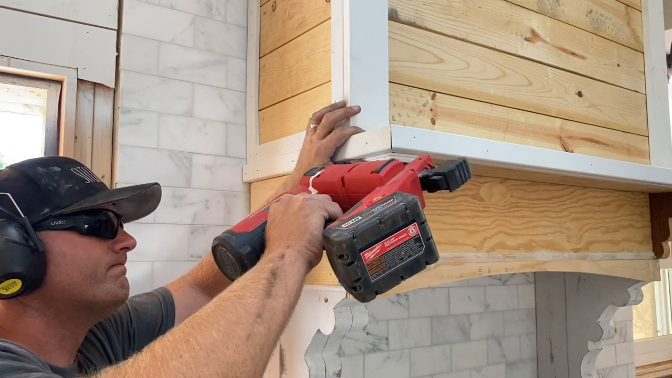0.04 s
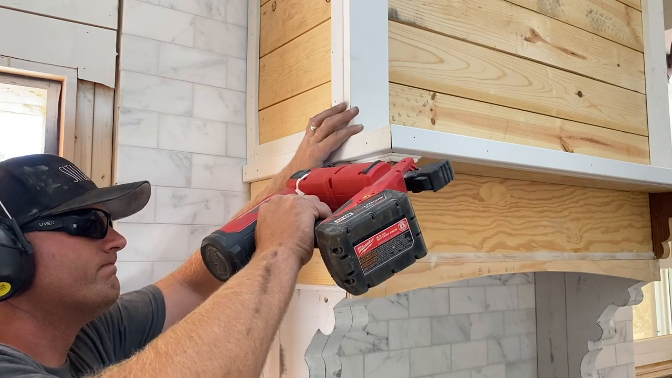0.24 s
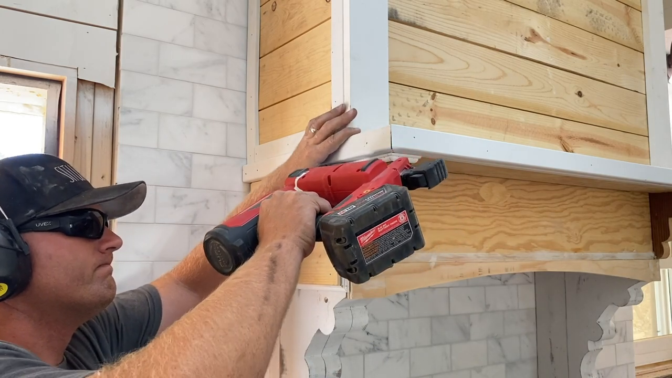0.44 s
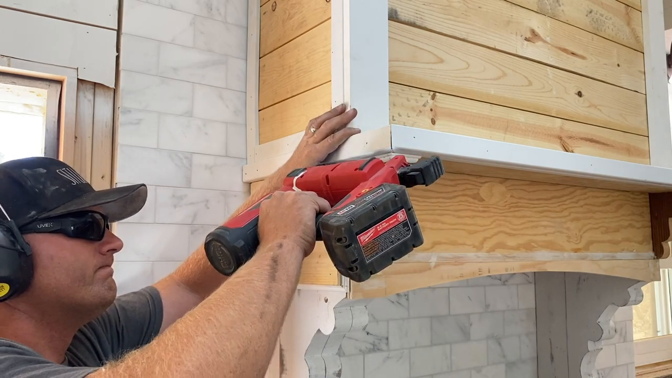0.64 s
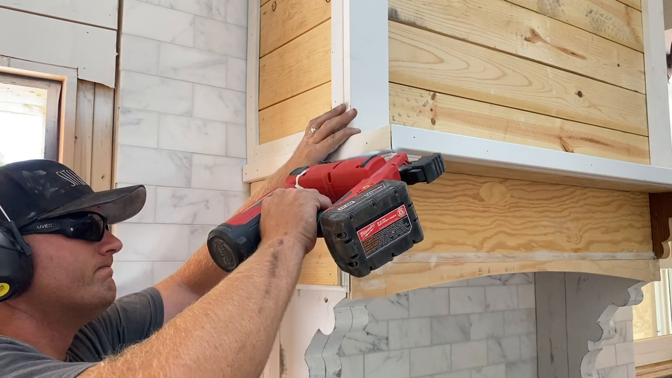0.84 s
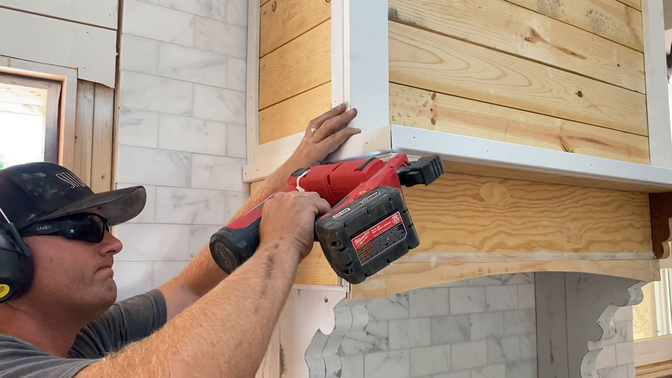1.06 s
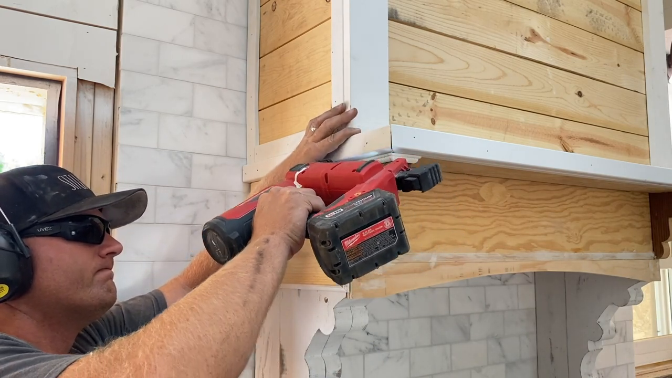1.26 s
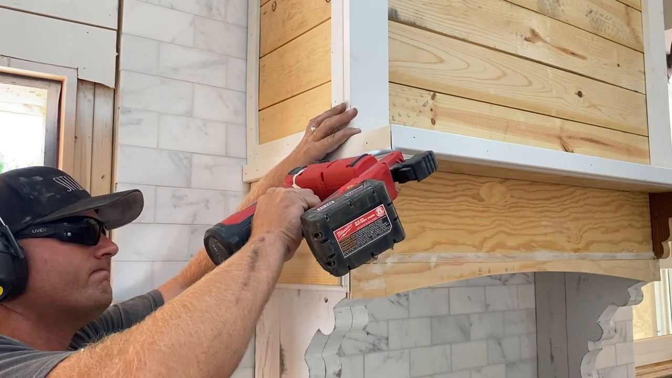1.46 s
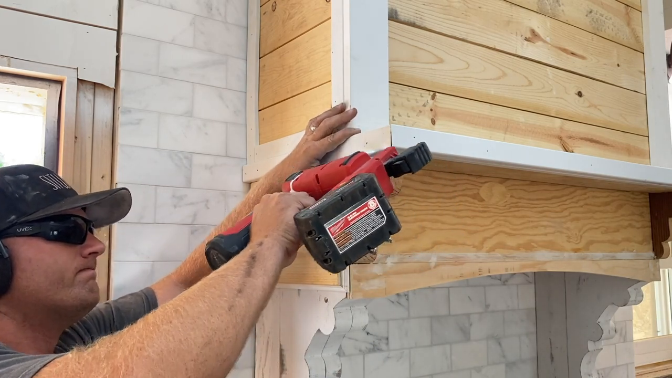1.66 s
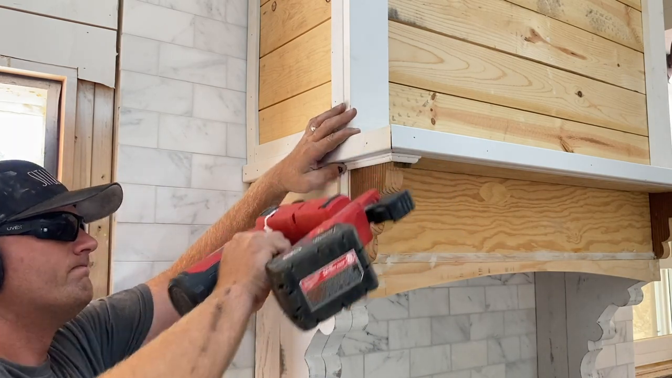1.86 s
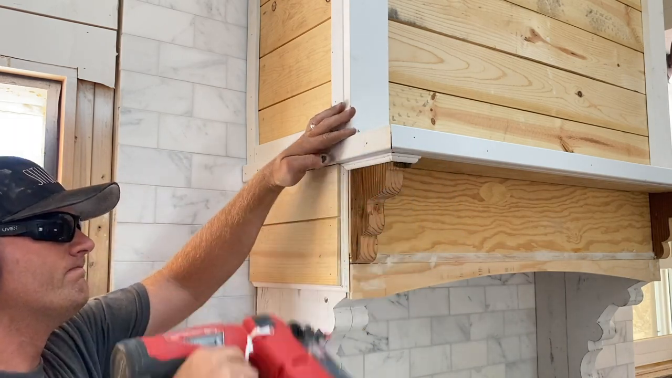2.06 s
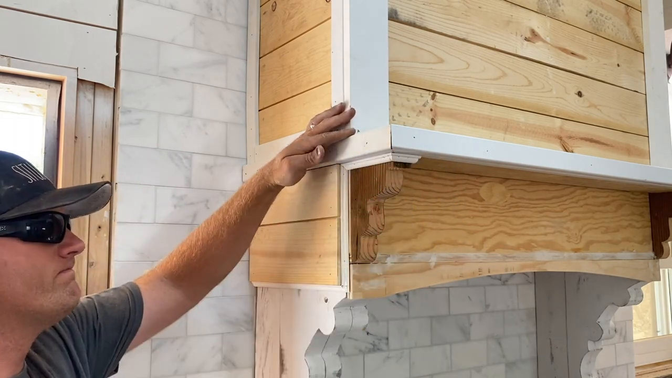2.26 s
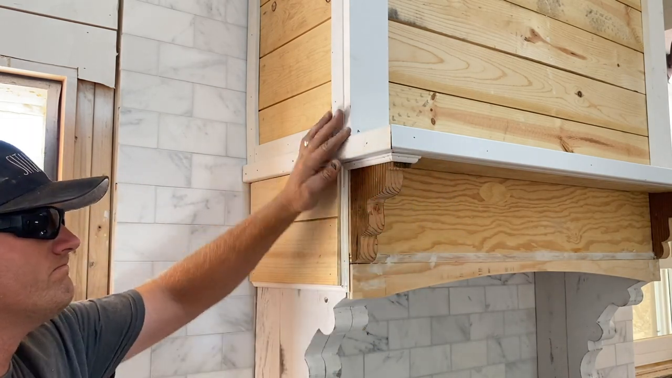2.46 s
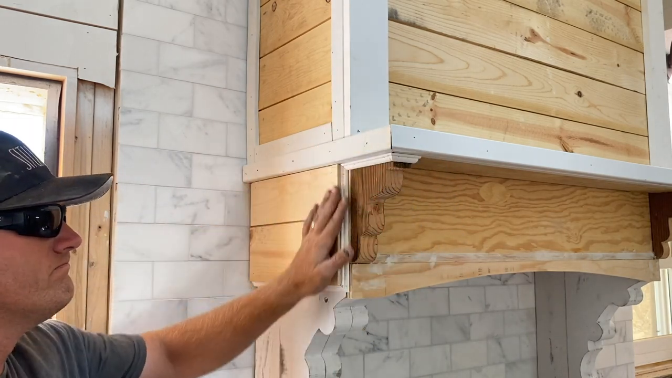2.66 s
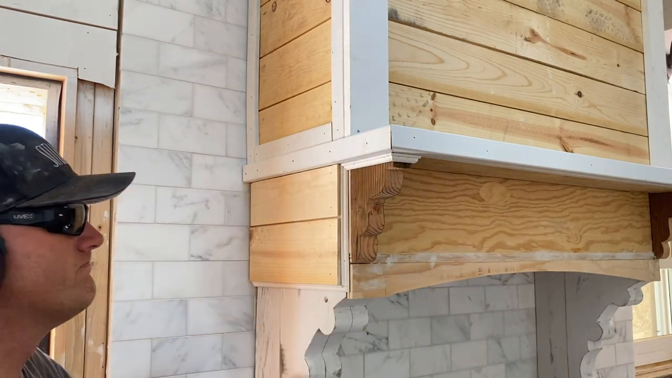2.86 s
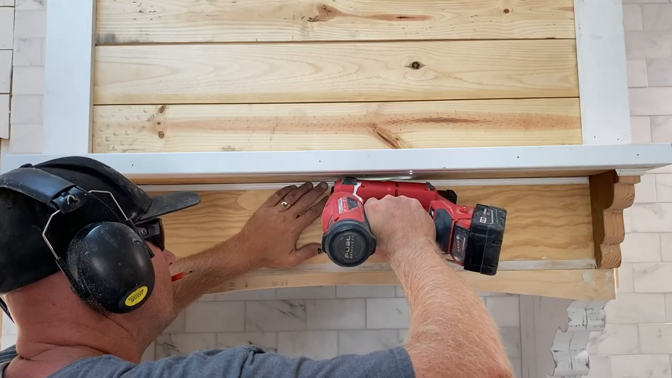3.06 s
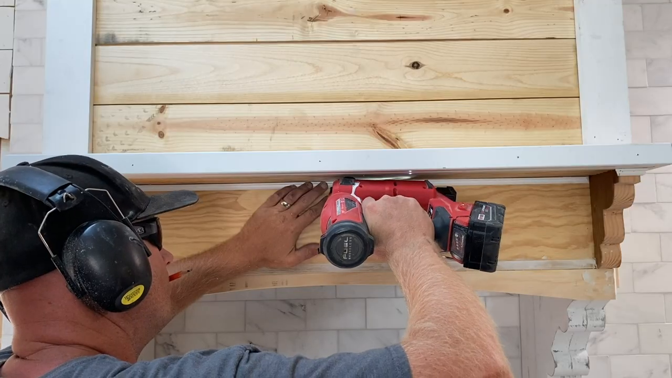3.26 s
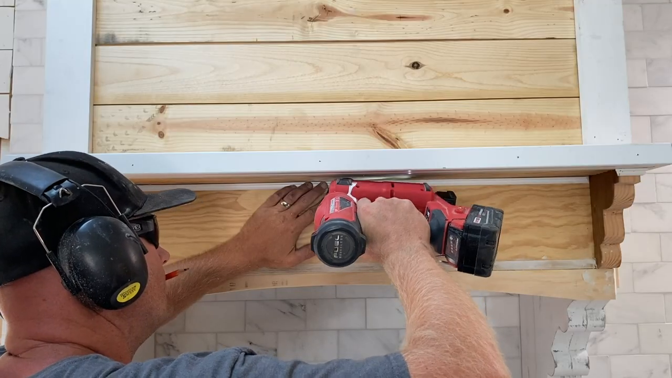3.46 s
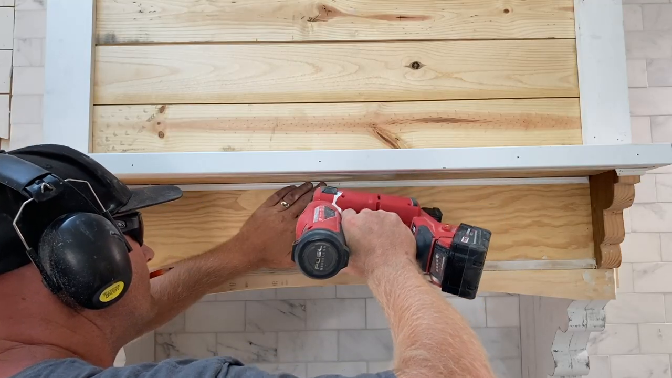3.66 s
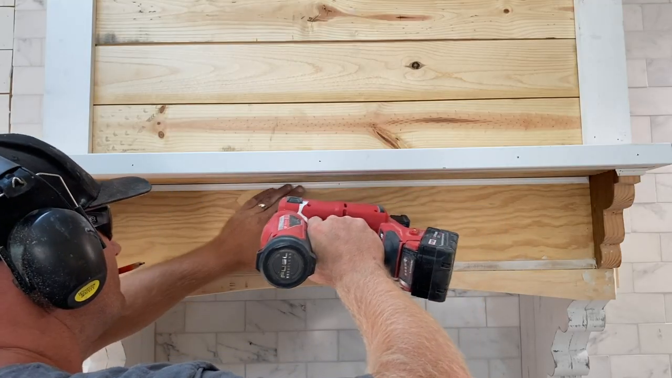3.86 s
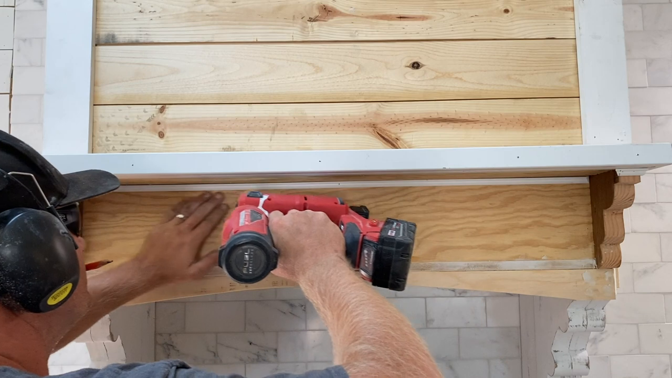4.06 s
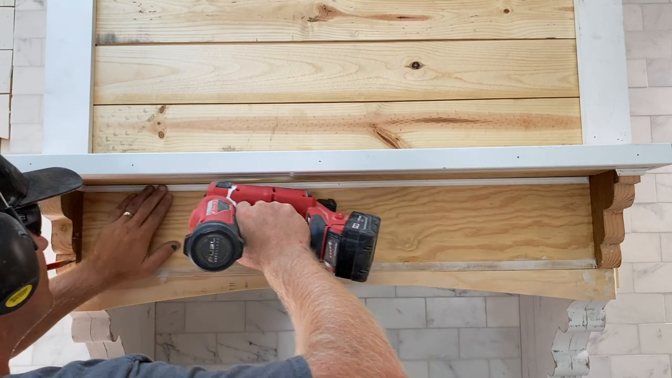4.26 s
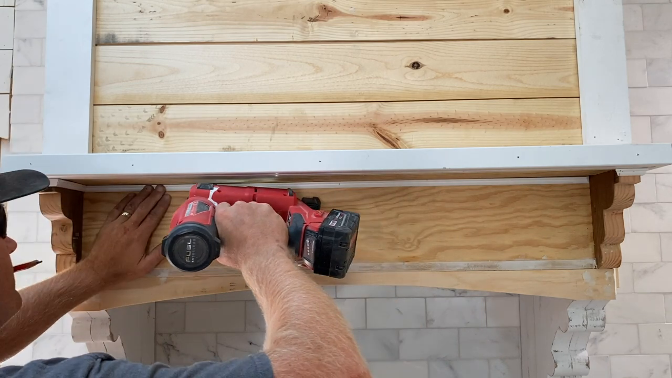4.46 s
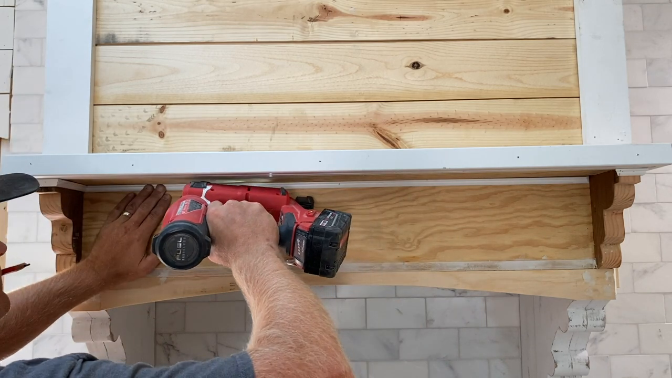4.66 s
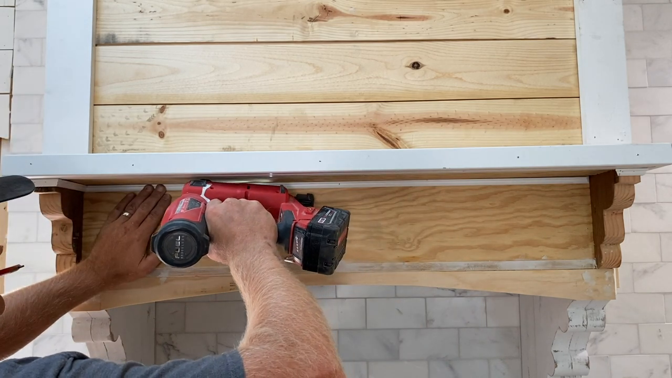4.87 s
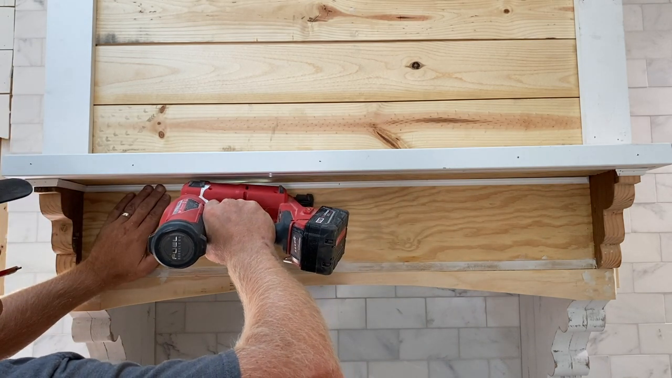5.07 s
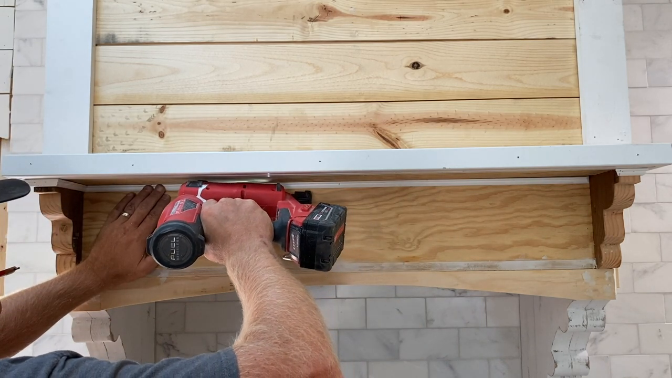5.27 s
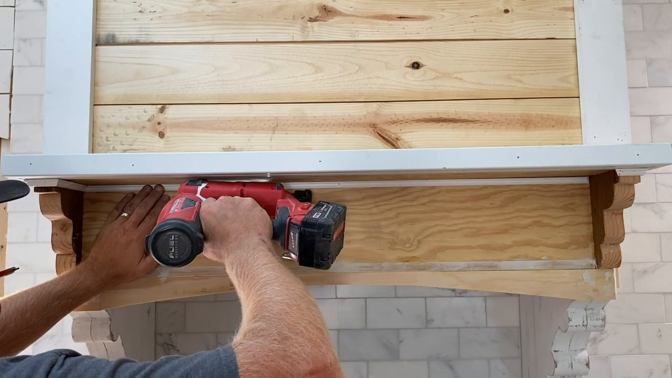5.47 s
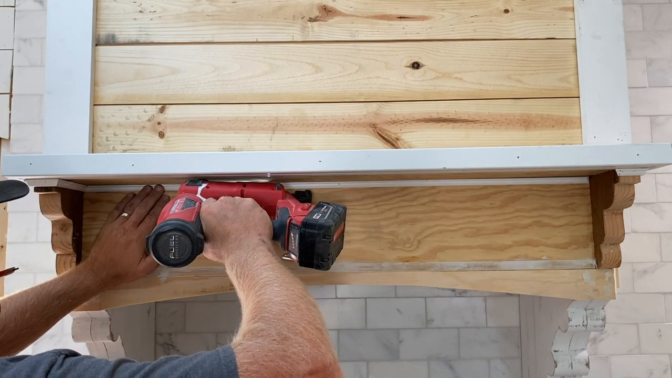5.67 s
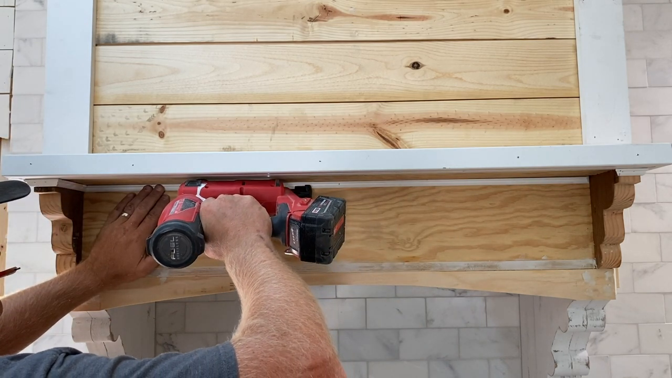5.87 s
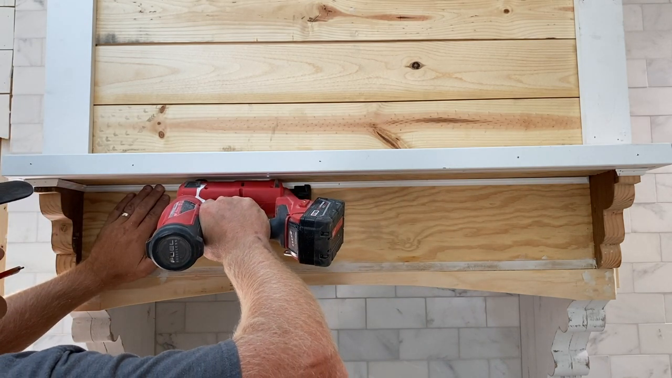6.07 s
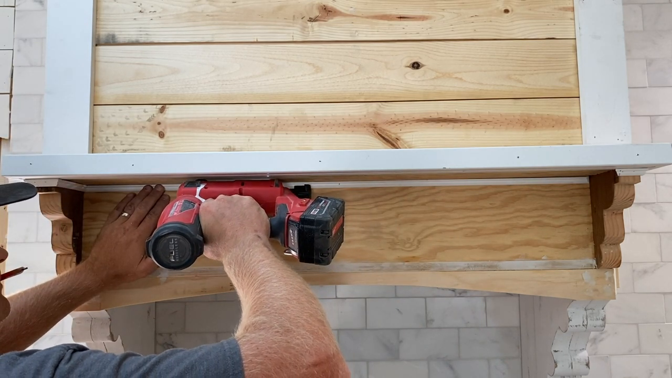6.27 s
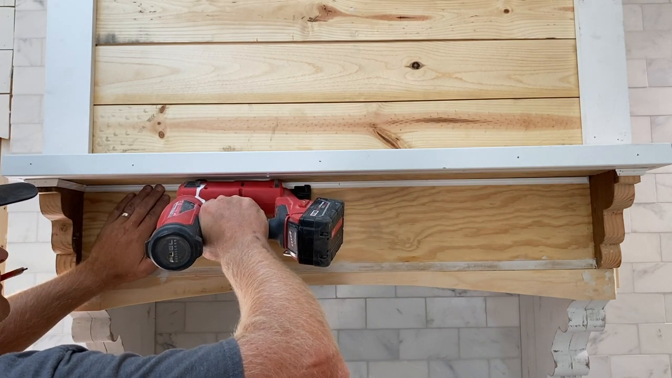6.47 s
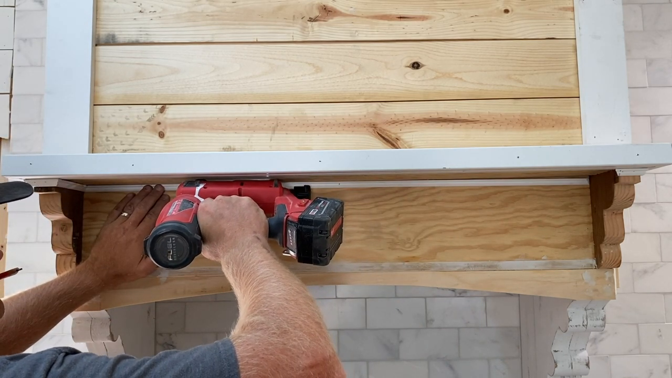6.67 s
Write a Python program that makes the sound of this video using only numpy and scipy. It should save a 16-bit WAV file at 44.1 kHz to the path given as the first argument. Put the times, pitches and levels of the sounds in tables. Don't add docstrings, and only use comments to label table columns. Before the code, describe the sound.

A battery nail gun fires three hard cracking shots into wooden trim, each with a brief gear whine, in a ringing tiled room over low hum.

```python
import sys
import numpy as np
from scipy import signal
from scipy.fft import rfft, irfft, next_fast_len
from scipy.io import wavfile

SR = 44100
rng = np.random.default_rng(int(sys.argv[2]) if len(sys.argv) > 2 else 0)


def digitize_waveform(pressure):
    field = np.atleast_2d(pressure).T
    bounded = np.clip(field, -1, 1)
    quanta = np.round(bounded * 32767).astype(np.int16)
    wavfile.write(sys.argv[1], SR, quanta)


def makeup_ratio(level_db):
    decades = np.asarray(level_db, float) / 20
    return 10 ** decades


N = 296339
LEAD = SR // 2
CHANGE_S = 2.965

# release, strike and latch in seconds, force in dB.
SHOTS = [
    (-.242, -.207, -.072, 0),
    (1.637, 1.6701, 1.8031, 0),
    (3.202, 3.2584, 3.3905, -1),
    (6.538, 6.5734, 6.7045, -.5),
]
# seconds after release, level in dB, dull share 0-1.
JOLT = [
    (0, -44, .05),
    (.0025, -24.5, .05),
    (.012, -28, .1),
    (.026, -34, .05),
]
# seconds after strike, level in dB, dull share 0-1.
SLIDE = [
    (-.032, -42, .1),
    (-.027, -25.5, .05),
    (-.018, -23, .05),
    (-.008, -20, .15),
    (.004, -18, .5),
    (.018, -26, .8),
]
# seconds after strike, level in dB, dull share 0-1.
WIND = [
    (.012, -34, .8),
    (.022, -25, .8),
    (.07, -25, .3),
    (.13, -28.5, .25),
    (.19, -28.5, .15),
    (.251, -27, .2),
    (.265, -35, .5),
    (.37, -44, .75),
    (.52, -70, 1),
]
# start and end in seconds after strike, first and last Hz, dB.
STROKES = [
    (.042, .13, 1925, 1655, 0),
    (.177, .25, 1870, 1590, -1),
]
# multiple of the stroke's tone, then level in dB in each of four shots.
MESH = [(1.5, -45, -45, -40, -42), (2, -39, -40, -34, -42), (2.5, -44, -44, -43, -44),
        (3.5, -46, -45, -45, -45), (5, -48, -46, -48, -47), (3, -43, -39, -39, -34),
        (4, -48, -38, -46, -46), (6, -48, -41, -51, -48)]
# start and end in seconds after strike, first and last Hz, dB.
SQUEALS = [
    [(-.032, -.015, 3750, 3700, -26), (-.015, -.002, 2500, 2900, -27), (-.015, -.001, 1250, 1300, -26),
     (-.012, -.003, 5350, 5350, -29), (.1, .13, 4050, 3980, -38), (.215, .262, 3900, 3760, -31),
     (.225, .255, 7900, 7800, -42)],
    [(-.034, -.021, 3800, 3550, -26), (-.021, -.006, 3500, 3950, -25), (-.016, .0015, 3100, 3650, -21.5),
     (.017, .05, 1250, 1270, -30), (-.014, -.005, 5300, 5350, -31), (-.002, .008, 3000, 2950, -26),
     (.085, .13, 4150, 3950, -37), (.2, .258, 4020, 3720, -28), (.225, .255, 7900, 7800, -42)],
]
# start and end in seconds, start and end Hz, level in dB.
COASTS = [
    (.33, .69, 2720, 2600, -75),
    (.68, .75, 2600, 2420, -75),
    (.74, .8, 3100, 3050, -78),
    (1.3, 1.5, 2150, 2050, -80),
    (2.2, 2.39, 2720, 2450, -73),
    (2.36, 2.45, 2480, 2000, -71),
]
# Hz, dB per Hz.
BRIGHT = [(180, -48), (300, -20), (426, -6.5), (777, -6.5), (1280, -9), (1570, -3), (2340, -3),
          (3870, -3.5), (4130, -4), (7930, -8.5), (13800, -16), (16300, -30)]
# Hz, dB per Hz.
DULL = [(35, -38), (60, -6), (420, -8), (625, -2), (772, 0), (1100, -2.5), (1260, -1.5), (1750, -11),
        (2610, -10.5), (6520, -18), (9710, -19), (16300, -35.5)]
# Hz, level in dB, t60 in seconds.
STEEL = [(830, -17, .18), (1540, -9, .22), (3170, -10, .25), (3480, -14, .2), (3747, -2, .3),
         (3705, -10, .2), (3795, -7, .3), (4650, -16, .2), (7820, -9, .25), (9345, -11, .25)]
# Hz, dB per Hz.
CRACK = [(180, -35.5), (300, -9.5), (727, -6.5), (1590, -11.5), (3160, -1), (4000, -11), (5050, 0),
         (5970, -4), (7540, 5), (15000, -8.5), (16300, -21.5)]
# seconds, peak in dB, ring in Hz.
CLEARS = [
    (1.6395, -12, 3750),
    (3.2094, -10, 2550),
    (6.5412, -10, 3550),
]
# Hz, then level in dB in each of four shots.
PAWL = [(2150, -10, -10, -8, -9), (2660, -3, -3, -8, -5), (3160, -7, -7, 0, 0), (4550, 0, 0, -9, -2),
        (5250, -4, -4, -6, -4), (6650, -2, -2, -7, -3), (7500, -1, -1, -8, -2), (8360, -5, -5, -11, -6),
        (9500, -8, -8, -11, -7), (10500, -10, -10, -8, -9), (12100, -11, -11, -10, -12),
        (13800, -17, -17, -17, -18)]
# seconds after latch, level in dB.
CHATTER = [
    [(.0004, 0), (.0016, -1), (.0036, -5)],
    [(-.0007, -8), (.0002, -3), (.0011, -1), (.0018, -2), (.003, -8)],
]
# peak in dB, ring in Hz, dullness 0-1, t60 in seconds.
TRIGGER = [
    (-49, 3100, .2, .02),
    (-39, 3000, .2, .022),
    (-40, 8000, 0, .022),
]
PULLS = [
    (1.5698, 1.5828, 1.6177),
    (3.1338, 3.1467, 3.1812),
    (6.4648, 6.4832, 6.5177),
]
# Hz, level in dB, t60 in seconds.
CABINET = [(70, -6.5, 0.11), (132.7, 0, 0.17), (156, 3, 0.092), (230, -3, 0.1), (386, 0, 0.12),
           (428, 1.5, 0.12), (557, 0, 0.32), (561, 5, .15), (785, -2, 0.21), (960, 2, 0.2),
           (1176, 4.5, .12), (1293, -3.5, .12)]
# seconds, peak in dB, first and last Hz, t60 in seconds.
BLOWS = [(4.862, -46, 900, 500, .08), (5.96, -34, 400, 270, .09), (5.985, -36, 90, 72, .3),
         (6.11, -43, 420, 350, .1), (6.24, -42, 70, 55, .3), (1.2, -46, 70, 55, .3),
         (2.98, -44, 120, 100, .4), (3.0, -44, 60, 50, .5), (2.898, -50, 900, 800, .1),
         (4.868, -48, 900, 883, .15), (.826, -58, 3480, 3480, .2), (.826, -56, 4380, 4380, .15)]
# seconds, peak in dB, ring in Hz, dullness about 0-1, t60 in seconds.
TICKS = [(.8245, -33, 4200, 0, .17), (.8744, -47, 7000, .1, .035), (1.1343, -41, 1910, .7, .05),
         (1.2684, -59, 7500, .2, .047), (2.2114, -33, 3150, .05, .039), (2.7402, -47, 1800, .3, .047),
         (2.8978, -47, 1650, .8, .058), (2.9647, -51.5, 1580, .1, .012), (4.33, -57, 2667, .5, .054),
         (4.5788, -61, 1912, .8, .05), (4.8613, -37, 4650, .3, .04), (4.8693, -36, 2780, .35, .07),
         (4.9162, -52, 2770, .8, .038), (4.9581, -47.5, 7030, .6, .035), (5.0394, -53, 4460, .7, .035),
         (5.0639, -48, 5810, .5, .035), (5.252, -51, 1890, 1.1, .04), (5.7528, -44, 4880, -.3, .018),
         (5.765, -60, 9000, -.2, .15), (5.8594, -56, 4950, .75, .044), (5.9624, -54, 1930, .95, .05),
         (6.0454, -52, 2400, 1.1, .05), (6.114, -54, 1690, .9, .035)]
# Hz, dB per Hz.
TICK = [(290, -28.5), (500, -3.5), (2180, -6), (2710, -2.5), (3960, -4.5), (8570, -9), (12300, -19),
        (14100, -25), (16300, -35)]
# start and length in
# seconds, level in dB, squeak in dB, rising share 0-1.
BRUSH = [(.33, .14, -74, -30, .2), (2.475, .14, -59.5, -25, .45), (2.59, .14, -58.5, -25, .4),
         (2.736, .14, -60, -6, .08), (2.895, .07, -67, -12, .1), (3.83, .08, -72, -20, .2),
         (1.585, .05, -64, -8, .1), (3.149, .05, -62, -8, .1), (6.486, .05, -64, -8, .1)]
# Hz, dB per Hz.
SKIN = [(880, -30), (1500, -10), (2490, -9), (5430, -10), (8500, -9), (12000, -12), (15200, -15),
        (16300, -22)]
# Hz, width in Hz.
SQUEAK = [(1850, 120), (5400, 250)]
# start and length in seconds, level in dB, first and last Hz.
BIRDS = [(.7, .12, -74, 2800, 3000), (2.97, .17, -68, 4150, 4100), (2.97, .16, -80, 7200, 7200),
         (2.97, .14, -81, 9000, 8900), (3.92, .12, -68, 3580, 2000), (4.13, .2, -76, 4500, 3300),
         (4.41, .2, -68, 4230, 3300), (4.735, .13, -66, 3870, 3500), (5.205, .15, -68, 4700, 3900),
         (5.36, .22, -68, 4000, 3500), (5.54, .2, -66, 3600, 3000), (5.9, .2, -72, 4200, 3300),
         (6.13, .28, -65, 3880, 3300)]
# start and end in seconds, start and end Hz, level in dB.
NOTES = [(4.19, 4.3, 3800, 3750, -79), (4.42, 4.5, 4300, 4150, -79), (4.74, 4.85, 3580, 3520, -75),
         (4.77, 4.83, 3000, 2900, -75), (5.22, 5.28, 4950, 4750, -76), (5.21, 5.26, 4500, 4250, -77),
         (2.962, 3.1, 4280, 4150, -78), (5.25, 5.31, 4200, 4000, -77), (5.37, 5.47, 4650, 4500, -75),
         (5.4, 5.52, 3300, 3180, -72), (5.56, 5.63, 3550, 3400, -76), (5.58, 5.7, 3200, 3000, -78),
         (6.15, 6.2, 3700, 3500, -75), (6.17, 6.32, 3350, 3150, -69)]
# Hz, dB per Hz.
AIR = [
    [(15, -41.5), (25, -11), (161, -2.5), (225, -8), (314, -4.5), (407, -11), (954, -15.5), (1730, -29.5),
     (2130, -35.5), (2680, -44), (5970, -48.5), (12000, -59), (15600, -89.5), (22000, -120)],
    [(15, -35), (25, -12.5), (127, -0.5), (358, -11), (418, -11.5), (527, -7.5), (584, -17.5), (700, -12.5),
     (1170, -27.5), (2300, -37.5), (3750, -42), (12000, -58.5), (15600, -95), (22000, -120)],
]
# seconds, level in dB.
AIR_LEVEL = [(0, -49), (.9, -51.5), (1.6, -51.5), (2.3, -55), (2.95, -52.5), (2.98, -50.5), (4.4, -51),
             (5, -50.5), (6.7, -50)]
# multiple of HUM_HZ, level in dB.
HUM = [(3, -57), (4, -56), (5, -61), (6, -60), (7, -59), (8, -59), (12, -63)]
# seconds, level in dB.
DRONE = [(2.9, -65), (3.2, -61), (3.55, -52), (3.78, -49.5), (4.0, -52), (4.16, -47), (4.5, -52),
         (4.69, -68), (4.8, -52), (4.92, -48), (5.08, -49), (5.4, -66), (5.55, -56), (5.98, -53),
         (6.2, -48.5), (6.32, -50), (6.5, -62)]
# Hz, t60 in seconds.
ROOM = [(125, .5), (500, .74), (2000, .8), (5000, .6), (14000, .18)]

FRONT_DULL = .35
# (peak dB,) tilt dB per octave, t60 s, room dB; the release takes its peak from CLEARS
RELEASE, STRIKE, LATCH = (-2.5, .025, -13), (-4, -4, .02, -19), (-4.5, -3, .014, -8)
STRIKE_HZ, LATCH_HZ = 10400, 7500
STRIKE_LEAD_S = .0015
# peak dB, ring Hz, tilt dB per octave, t60 s, room dB
TOOTH, TOOTH_GAP_S, TOOTH_FROM = (-23.5, 11500, 6, .016, -16), .0165, .35
PAWL_DB, PAWL_T60, PAWL_RISE_S, PAWL_ROOM_DB = -9, .01, .0002, -10
LOCK_S, LOCK_DB = .12, (-7, -13)
# delay s, peak dB, first Hz, last Hz, t60 s
NAIL, PUSH, CATCH = (-.003, -11.5, 1100, 600, .02), (.003, -7, 570, 72, .04), (.001, -15, 870, 760, .036)
SHARP_TILT_DB, DULL_TILT_DB, SHARP_ROOM_DB, DULL_ROOM_DB = 2, -9, -13.5, -4
STROKE_FADE_DB = -16
CALL_RISE_S, CALL_FADE_DB, RASP_WIDTH_HZ = .03, -10, 1200
CLEAR_DB = 2.2
HUM_HZ = 44.1


def shot(index, release, strike, latch, force_db):
    front = int(strike > CHANGE_S)
    work = [[(release + s, db + force_db, dull) for s, db, dull in JOLT]]
    for part in (SLIDE, WIND):
        rows = []
        for s, db, dull in part:
            drumming = front * FRONT_DULL * (strike < strike + s < latch)
            rows.append((strike + s, db + force_db, dull + drumming))
        work.append(rows)

    tones = [(a, b, k * hz0, k * hz1, db + levels[index])
             for a, b, hz0, hz1, db in STROKES for k, *levels in MESH]
    tones = [(strike + a, strike + b, hz0, hz1, db + force_db)
             for a, b, hz0, hz1, db in tones + SQUEALS[front]]

    cracks = []
    for s, hz, (db, *rest) in ((strike - STRIKE_LEAD_S, STRIKE_HZ, STRIKE), (latch, LATCH_HZ, LATCH)):
        cracks.append((s, db + force_db, hz, *rest))
    for a, b, *_ in STROKES:
        loaded = np.arange(a + TOOTH_FROM * (b - a), b, TOOTH_GAP_S)
        cracks += [(strike + s, *TOOTH) for s in loaded]

    contact = pawl(index, force_db)
    chatter = [(latch + s, makeup_ratio(db) * contact) for s, db in CHATTER[front]]
    blows = [(s + delay, db + force_db, *rest)
             for s, (delay, db, *rest) in ((strike, NAIL), (strike, PUSH), (latch, CATCH))]
    return work, tones, cracks, chatter, blows, [(latch + LOCK_S, LOCK_DB[front] + force_db)]


def gears(rows):
    s, (db, dull) = unrolled(rows)
    count = len(db)
    dull = np.clip(dull, 0, 1)
    uneven = makeup_ratio(1.36 * wander(count, 280))
    bright_part = np.sqrt(1 - dull) * coloured(hiss(count) * uneven, BRIGHT)
    dull_part = np.sqrt(dull) * coloured(hiss(count) * uneven, DULL)
    return s, makeup_ratio(db) * (bright_part + dull_part)


def whine(start, end, hz0, hz1, db):
    count = round((end - start) * SR)
    glide = hz1 + (hz0 - hz1) * np.linspace(1, 0, count) ** 1.6
    hz = glide * (1 + .009 * wander(count, 150))
    shape = signal.windows.tukey(count, .4) * makeup_ratio(db + 3.2 * wander(count, 70))
    return start, np.sqrt(2) * shape * np.sin(2 * np.pi * np.cumsum(hz) / SR)


def knock(spectrum, ring_db, rise_s, db, hz, tilt_db, t60):
    t = np.arange(SR // 8) / SR
    noise = rng.standard_normal(len(t))
    tilted = [(f, level + tilt_db * np.log2(f / 3000)) for f, level in spectrum]
    burst = coloured(noise, tilted) + makeup_ratio(ring_db) * evened(resonate(noise, hz, 600))
    burst *= makeup_ratio(-60 * t / t60) * (1 - np.exp(-t / rise_s))
    return makeup_ratio(db) * burst / abs(burst).max()


def pawl(index, force_db):
    t = np.arange(SR // 40) / SR
    ring = sum(makeup_ratio(db[index]) * np.sin(2 * np.pi * (hz * t + rng.random())) for hz, *db in PAWL)
    return ring * makeup_ratio(PAWL_DB + force_db - 60 * t / PAWL_T60) * (1 - np.exp(-t / PAWL_RISE_S))


def blow(s, db, hz0, hz1, t60):
    t = np.arange(SR // 2) / SR
    hz = hz1 + (hz0 - hz1) * np.exp(-t / .0045)
    shape = makeup_ratio(db - 60 * t / t60) * (1 - np.exp(-t * hz0 * 1.1))
    return s, shape * np.sin(2 * np.pi * np.cumsum(hz) / SR)


def rung(x, modes):
    t = np.arange(SR // 2) / SR
    body = sum(makeup_ratio(db - 60 * t / t60) * np.sin(2 * np.pi * hz * t) for hz, db, t60 in modes)
    return signal.oaconvolve(x, body / np.linalg.norm(body))


def tick(s, db, hz, dull, t60):
    tilt_db = SHARP_TILT_DB + (DULL_TILT_DB - SHARP_TILT_DB) * dull
    room_db = SHARP_ROOM_DB + (DULL_ROOM_DB - SHARP_ROOM_DB) * dull
    return s, db, hz, tilt_db, t60, room_db


def brush(start, length, db, squeak_db, rise):
    u = np.linspace(0, 1, round(length * SR))
    count = len(u)
    pressure = np.minimum(u / rise, 1) * makeup_ratio(db + STROKE_FADE_DB * u ** 2 + 1.3 * wander(count, 90))
    sung = sum(evened(resonate(hiss(count), hz, width_hz)) for hz, width_hz in SQUEAK)
    return start, pressure * (coloured(hiss(count), SKIN) + makeup_ratio(squeak_db) * sung)


def bird(start, length, db, first_hz, last_hz):
    t = np.arange(round(length * SR)) / SR
    count = len(t)
    lowpass = signal.butter(3, RASP_WIDTH_HZ / 2, fs=SR, output="sos")
    spread = signal.sosfilt(lowpass, hiss(count) + 1j * hiss(count))
    hz = np.geomspace(first_hz, last_hz, count)
    rasp = (spread * np.exp(2j * np.pi * np.cumsum(hz) / SR)).real
    effort_db = db - 1.5 + CALL_FADE_DB * (t / length) ** 2 + 2.2 * wander(count, 40)
    return start, np.minimum(t / CALL_RISE_S, 1) * makeup_ratio(effort_db) * evened(rasp)


def room(x):
    onset = np.clip(np.arange(SR) / SR / 0.004 - .25, 0, 1)
    hz, t, z = signal.stft(rng.standard_normal(SR) * onset, SR, nperseg=256)
    decay = makeup_ratio(-60 * t / read(ROOM, hz)[:, None])
    tail = signal.istft(z * decay, SR, nperseg=256)[1]
    return signal.fftconvolve(x, tail / np.linalg.norm(tail))[:len(x)]


def background():
    t = np.arange(N) / SR
    air = np.where(t < CHANGE_S, *(coloured(rng.standard_normal(N), place) for place in AIR))
    air *= makeup_ratio(np.interp(t, *np.transpose(AIR_LEVEL)) + .8 * wander(N, 6))
    turns = np.cumsum(HUM_HZ * (1 + .003 * wander(N, 2.2))) / SR
    hum = sum(makeup_ratio(db + 0.64 * wander(N, 2.9)) * np.sin(2 * np.pi * (k * turns + rng.random()))
              for k, db in HUM)
    drone = np.sin(2 * np.pi * np.cumsum(62.5 + 2.3 * wander(N, 2.7)) / SR)
    return air + hum + makeup_ratio(np.interp(t, *np.transpose(DRONE)) + 2) * drone


def hiss(count):
    return rng.standard_normal(max(count, SR * 3 // 5))[:count]


def wander(count, hz):
    return evened(signal.sosfiltfilt(signal.butter(2, hz, fs=SR, output="sos"), hiss(count)))


def evened(x):
    return x / np.sqrt(np.mean(x ** 2) + 1e-20)


def read(points, hz):
    f, value = np.transpose(points)
    return np.interp(np.log(hz + 1), np.log(f + 1), value)


def coloured(x, spectrum):
    size = next_fast_len(len(x))
    gain = makeup_ratio(read(spectrum, np.fft.rfftfreq(size, 1 / SR)))
    return evened(irfft(rfft(x, size) * gain, size)[:len(x)])


def resonate(x, hz, width_hz):
    turn = np.exp(2j * np.pi * np.cumsum(hz * np.ones(len(x))) / SR)
    r = np.exp(-np.pi * width_hz / SR)
    return 2 * (turn * signal.lfilter([1 - r], [1, -r], x / turn)).real


def unrolled(rows):
    s, *columns = np.transpose(rows)
    t = np.arange(s[0], s[-1], 1 / SR)
    return s[0], [np.interp(t, s, c) for c in columns]


def add(mix, s, sound):
    part = mix[LEAD + round(s * SR):][:len(sound)]
    part += sound[:len(part)]


def scene():
    motor, tones, stops, hits, echoes, blows, far = np.zeros((7, N + LEAD))
    piles = work, whines, cracks, chatter, pushes, locks = [], [], [], [], [], []
    for index, row in enumerate(SHOTS):
        for pile, part in zip(piles, shot(index, *row)):
            pile.extend(part)
    cracks += [(*row, *RELEASE) for row in CLEARS]
    ticks = [tick(s, *rest) for pull in PULLS for s, rest in zip(pull, TRIGGER)]
    ticks += [tick(*row) for row in TICKS]

    for rows in work:
        add(motor, *gears(rows))
    for row in whines + COASTS:
        add(tones, *whine(*row))
    for s, db in locks:
        add(stops, s, makeup_ratio([db]))
    for s, sound in chatter:
        add(hits, s, sound)
        add(echoes, s, makeup_ratio(PAWL_ROOM_DB) * sound)
    for spectrum, ring_db, rise_s, rows in ((CRACK, -6, .0008, cracks), (TICK, -7, .0004, ticks)):
        for s, *body, room_db in rows:
            sound = knock(spectrum, ring_db, rise_s, *body)
            add(hits, s, sound)
            add(echoes, s, makeup_ratio(room_db) * sound)
    for row in pushes + BLOWS:
        add(blows, *blow(*row))
    clear_notes = [(*row, db + CLEAR_DB) for *row, db in NOTES]
    for source, rows in ((brush, BRUSH), (bird, BIRDS), (whine, clear_notes)):
        for row in rows:
            add(far, *source(*row))

    gun = motor + tones + rung(makeup_ratio(-20) * motor + stops, STEEL)[:len(motor)]
    wood = blows + makeup_ratio(-13) * rung(blows, CABINET)[:len(blows)]
    wet = room(makeup_ratio(-11.5) * gun + makeup_ratio(-11.5) * wood + echoes + makeup_ratio(-10) * far)
    return ((gun + wood + hits + far + wet)[LEAD:] + background())[None]


def top_cut(x):
    return signal.sosfilt(signal.butter(12, 16410, fs=SR, output="sos"), x)


def record(dry):
    overloaded = np.clip(dry, -1, 1)
    edge = signal.firwin(255, 16150, window=("kaiser", 7), fs=SR)
    mix = signal.oaconvolve(overloaded, edge[None], "same")
    return top_cut(mix)


dry = scene()
out = record(dry)
digitize_waveform(out)
```